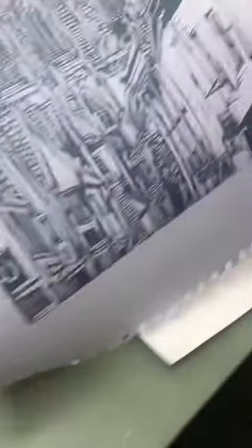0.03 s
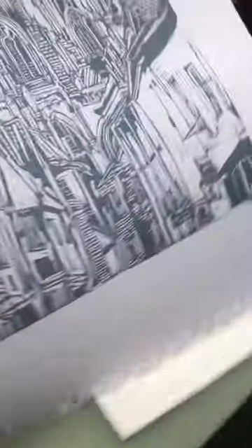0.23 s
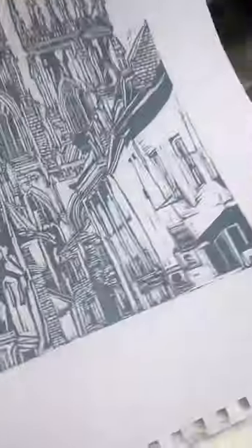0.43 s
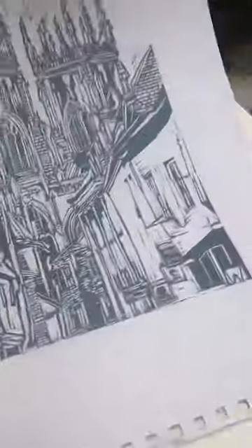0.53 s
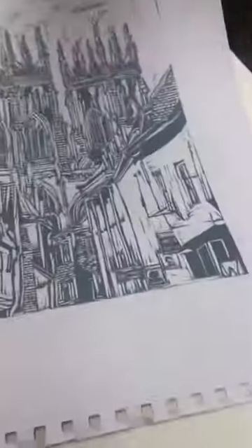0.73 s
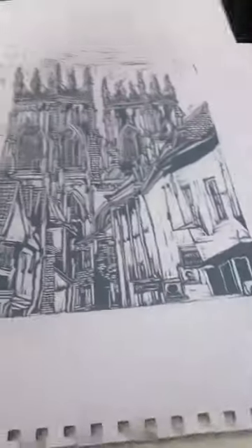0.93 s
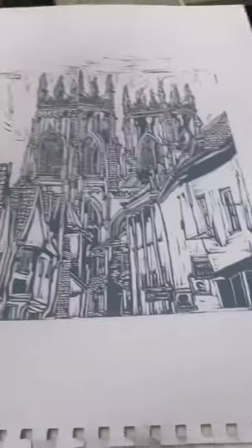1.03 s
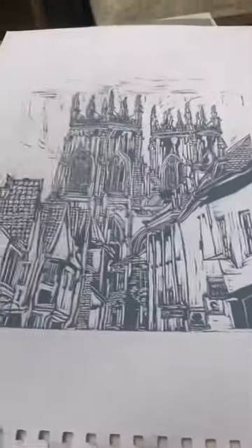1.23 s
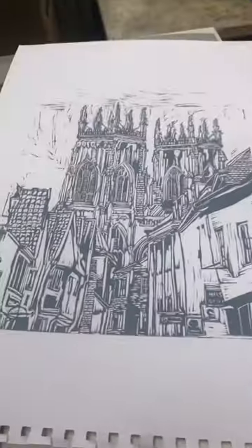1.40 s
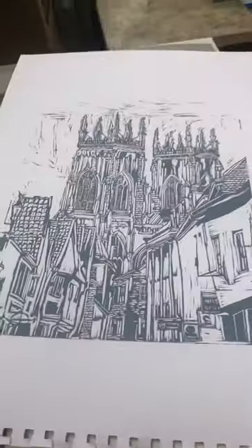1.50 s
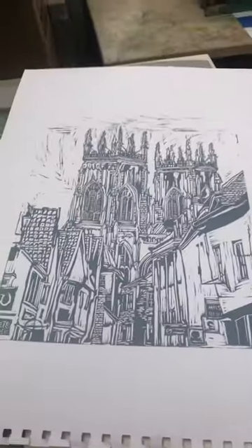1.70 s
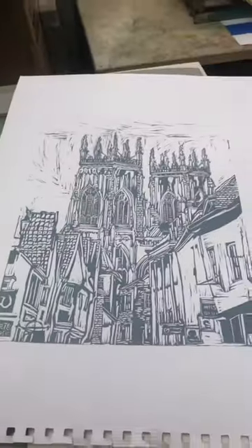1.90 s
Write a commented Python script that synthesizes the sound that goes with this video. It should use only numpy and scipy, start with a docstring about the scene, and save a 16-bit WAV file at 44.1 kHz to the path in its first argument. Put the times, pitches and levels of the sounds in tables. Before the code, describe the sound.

A sheet of paper slides off a sketch pad close by with a fine hiss, buckling in a cluster of sharp snaps around 0.3 seconds. Hollow wobbling pops, edge scrapes and more crackles continue until about 0.8 seconds. It settles with small ticks near 0.9 seconds. A few very soft brushes follow from 1.2 to 1.8 seconds, over a faint low hum in a quiet room.

```python
"""Drawing paper lifted and laid flat.

A sheet comes off a sketch pad, close by in a quiet room. Its fibres catch on the page below with a
fine hiss and its edge scrapes. It buckles with sharp snaps, wobbles with hollow pops and settles.
A few soft brushes follow, over a low hum."""
import sys
import numpy as np
from scipy import signal
from scipy.fft import rfft, irfft
from scipy.io import wavfile
from scipy.ndimage import uniform_filter1d

SR = 44100
rng = np.random.default_rng(int(sys.argv[2]) if len(sys.argv) > 2 else 0)


def transcribe(signal):
    """Save signal, clipped to [-1, 1], as a 16-bit WAV file at the path in sys.argv[1]."""
    frames = np.atleast_2d(signal).T
    limited = np.clip(frames, -1, 1)
    pcm = np.round(limited * 32767).astype(np.int16)
    wavfile.write(sys.argv[1], SR, pcm)


N = 85995

# Each row: frequency in Hz, relative level in dB.
RUB_SPECTRUM = [(60, -41), (200, -5.5), (700, -1), (1500, 0), (3000, 0), (4300, -3), (5400, -3), (7000, -5),
                (10000, -7), (16000, -9)]
# Each row: centre in Hz, width in Hz, boost in dB.
SHEET_RESONANCES = [(4890, 380, 4.2)]
PATCH_DB, JUDDER_DB, TILT_FROM_HZ = 2.5, 1.07, 600


def rub(contour):
    """Catching fibres excite the sheet as the contact shifts; contour(t) gives dB and dB per octave."""
    fibres = clicks(per_s=26000, spread_db=1.84)
    hz, t, spectra = signal.stft(fibres, SR, nperseg=512, noverlap=384)
    level_db, _ = contour(np.arange(N) / SR)
    _, tilt = contour(t)
    resonance_db = sum(db / (1 + (2 * (hz - f) / width) ** 2) for f, width, db in SHEET_RESONANCES)
    octaves = np.log2(np.maximum(hz / TILT_FROM_HZ, 1))
    gain = amp(at_hz(RUB_SPECTRUM, hz) + resonance_db + tilt[:, None] * octaves)
    gain /= np.sqrt(np.mean(gain ** 2, axis=1, keepdims=True))
    patches = uniform_filter1d(rng.standard_normal(gain.shape), size=12, axis=0)
    patches = unit(uniform_filter1d(patches, size=4, axis=1))
    gain *= amp(PATCH_DB * patches)
    hiss = signal.istft(spectra * gain.T, SR, nperseg=512, noverlap=384)[1][:N]
    judder = unit(uniform_filter1d(rng.standard_normal(N), size=200))
    return unit(hiss) * amp(level_db + JUDDER_DB * judder)


# Each row: time in seconds, level in dB, treble tilt in dB per octave.
SLIDE_CONTOUR = [(0, -61.5, -1.5), (.12, -57.5, -1), (.2, -52, -2), (.252, -47, .5), (.275, -41.5, -7.5),
                 (.287, -50, -3), (.315, -59.5, 0), (.35, -50, -1.5), (.4, -50.5, -2), (.47, -54.5, 1.2),
                 (.48, -51.5, 2), (.518, -43, -1), (.532, -51, 0.5), (.575, -49, 2), (.605, -44.5, 0.5),
                 (.648, -40, 0.5), (.672, -44, -0.5), (.685, -49, -1), (.728, -52.5, 0.5),
                 (.756, -44.5, .5), (.764, -55, -3), (.81, -63, 1), (.93, -64, -0.9), (1.02, -75, 1.5)]


def slide():
    """The sheet rubs over the page below."""
    return rub(lambda t: at_times(SLIDE_CONTOUR, t))


# Each row: start in seconds, pitch in Hz, level in dB, relative flutter level in dB,
# flutter decay in seconds, relative crack level in dB.
SNAPS = [(0.256, 2870, -14.5, -7, 0.00097, -26), (0.2572, 1100, -19.5, -3.5, 0.0065, -12),
         (0.2602, 3900, -26.5, -4, 0.0027, -5), (0.2622, 7400, -25, 4, 0.0035, -8),
         (0.2785, 2970, -43.5, 6.5, 0.0022, -0.5), (0.2917, 2970, -29, 7, 0.0018, -10),
         (0.296, 3220, -19.5, 1, 0.00087, -16), (0.296, 15200, -21, -4.5, 0.001, -12.5),
         (0.2965, 1260, -25.5, -1, 0.0025, -17), (0.3282, 1660, -36, 2, 0.0018, -13),
         (0.348, 2830, -31, 1, 0.0011, -8), (0.3706, 750, -25.5, 3.5, 0.007, -40),
         (.387, 150, -36, 0, 0.0054, -41), (0.4744, 7350, -29.5, -8, 0.0012, -6),
         (0.5880, 870, -29, 5, 0.0056, -10), (0.6203, 900, -21, -14, 0.0028, -14),
         (0.6227, 1610, -26.5, 6, 0.0048, -23), (0.695, 255, -42.5, -2, 0.004, -25),
         (0.898, 264, -44, -15, 0.0033, -23), (0.9268, 374, -42, -3.5, 0.0052, -23),
         (0.9266, 1760, -41, 1, 0.0045, -16), (0.9324, 4650, -43.5, -1, 0.00056, -13),
         (.961, 2870, -38, -9, 0.0028, -7), (1.5937, 704.5, -52, -2.5, 0.0027, 0.5)]
SWELL_CYCLES, RING_CYCLES, SAG_CYCLES, SAG_SHARE = 0.75, 0.46, 4, 0.24
CRACK_CUTOFF_HZ, CRACK_DECAY_S = 6660, 0.00084


def buckle(hz, db, flutter_db, flutter_s, crack_db):
    """A flick and a crack, then a flutter of reflections from the edges of the sheet."""
    t = np.arange(SR // 10) / SR
    scatter, grit = rng.standard_normal((2, len(t)))
    grit = unit(signal.lfilter(*signal.butter(2, CRACK_CUTOFF_HZ, fs=SR), grit))
    direct = flick(t, hz) + amp(crack_db) * grit * np.exp(-t / CRACK_DECAY_S)
    echoes = scatter ** 3 * np.sqrt(t) * np.exp(-t / flutter_s)
    flutter = signal.fftconvolve(direct, echoes)[:len(t)]
    return amp(db) * (direct + amp(flutter_db) * direct.std() * unit(flutter))


def flick(t, hz):
    """Peaks within a cycle and sags in pitch: the slower, lower bending waves arrive last."""
    cycles = t * hz
    sag = SAG_SHARE * (1 - np.exp(-cycles / SAG_CYCLES))
    phase = 2 * np.pi * np.cumsum(hz * (1 - sag)) / SR
    envelope = (1 - np.exp(-(cycles / SWELL_CYCLES) ** 2)) * np.exp(-cycles / RING_CYCLES)
    return envelope / envelope.max() * np.sin(phase)


# Each row: time in seconds, level in dB.
WOBBLE_LEVEL = [(0, -61.5), (.245, -76), (.265, -52.5), (.31, -48.5), (.335, -53.5), (.362, -45.5),
                (.378, -39), (.43, -40), (.475, -43.5), (.53, -61), (.575, -64), (.595, -45), (.64, -49.5),
                (.67, -65), (.74, -66), (.768, -47), (.82, -70.5), (.93, -63.5), (1, -74)]
# Each row: frequency in Hz, relative level in dB.
WOBBLE_SPECTRUM = [(50, -69), (110, -11), (150, 1), (320, 1.5), (620, 0.5), (980, -4), (1250, -13.5),
                   (2500, -43), (16000, -57)]


def wobble():
    """The bowed sheet flexes in a run of small hollow pops."""
    pops = coloured(clicks(per_s=1500, spread_db=1), WOBBLE_SPECTRUM)
    return pops * amp(at_times(WOBBLE_LEVEL, np.arange(N) / SR)[0])


# Each row: start in seconds, length in seconds, pitch in Hz, bandwidth in Hz, level in dB.
EDGE_SCRAPES = [(0.15, 0.13, 2950, 440, -60.5), (0.45, 0.07, 6500, 5000, -50.5),
                (0.476, 0.059, 2030, 580, -53.5), (0.56, 0.096, 2480, 93, -51.5),
                (0.58, .15, 5260, 300, -57)]
SCRAPE_ATTACK_S, SCRAPE_RELEASE_S = 0.001, 0.011
WANDER_SHARE, WANDER_RATE_HZ = 0.0089, 25.2


def scrape(length_s, hz, width_hz, db):
    """Stick and slip keeps one resonance of the edge ringing; its pitch drifts with the grip."""
    t = np.arange(0, length_s, 1 / SR)
    f = np.fft.rfftfreq(N, 1 / SR)
    slips, grip = rfft(rng.standard_normal((2, N)))
    resonance = 1 / (1 + (2 * (f - hz) / width_hz) ** 2)
    ring = signal.hilbert(irfft(slips * resonance, N))[:len(t)]
    wander = unit(irfft(grip * np.exp(-(f / WANDER_RATE_HZ) ** 2), N))[:len(t)]
    shift_hz = hz * WANDER_SHARE * wander
    bent = (ring * np.exp(2j * np.pi * np.cumsum(shift_hz) / SR)).real
    envelope = np.minimum(t / SCRAPE_ATTACK_S, 1) * np.minimum((length_s - t) / SCRAPE_RELEASE_S, 1)
    return amp(db) * unit(bent) * envelope


# Each row: peak time, rise and fall in seconds, level in dB, treble tilt in dB per octave.
BRUSH_STROKES = [(1.214, 0.086, 0.11, -61, -3.5), (1.391, 0.049, 0.033, -62.5, -3.5),
                 (1.625, 0.013, 0.046, -61.5, -1.5), (1.662, 0.028, 0.016, -62.5, 4.5),
                 (1.765, 0.008, 0.0073, -66, -2.5)]


def brushes():
    """Soft rubs over the flat sheet, each swelling and fading as a bell curve."""
    def contour(t):
        power = np.array([amp(db) ** 2 * np.exp(-((t - peak) / np.where(t < peak, rise, fall)) ** 2)
                          for peak, rise, fall, db, _ in BRUSH_STROKES]) + 1e-16
        tilts = np.array(BRUSH_STROKES)[:, 4]
        return 10 * np.log10(power.sum(0)), tilts @ power / power.sum(0)
    return rub(contour)


# Each row: frequency in Hz, time to fall 60 dB in seconds.
ROOM_DECAY = [(150, 0.51), (800, 0.13), (3000, 0.29), (12000, 0.04)]
REVERB_DB, REVERB_DELAY_S = -18.5, 0.0055


def reverb(x):
    """The short tail of a small furnished room."""
    hz, t, spectra = signal.stft(rng.standard_normal(SR // 2), SR, nperseg=256)
    decay = amp(-60 * t / at_hz(ROOM_DECAY, hz)[:, None])
    tail = signal.istft(spectra * decay, SR, nperseg=256)[1]
    wet = np.zeros(N)
    add(wet, REVERB_DELAY_S, signal.fftconvolve(x, tail / np.linalg.norm(tail)))
    return amp(REVERB_DB) * wet


# Each row: time in seconds, pitch in Hz.
HUM_PITCH = [(0, 55.33), (.3, 58.1), (1.25, 61.06), (1.95, 62.03)]
# Each row: time in seconds, level in dB.
HUM_LEVEL = [(0, -49), (.2, -53.5), (.47, -53), (.8, -67.5), (1.15, -65.5), (1.23, -55.5), (1.52, -60),
             (1.66, -55), (1.95, -59.5)]
# Each row: harmonic number, level in dB relative to the fundamental.
HUM_HARMONICS = [(2, -18), (3, -18)]


def hum():
    """A low hum that creeps up in pitch while its level dips and swells."""
    t = np.arange(N) / SR
    phase = 2 * np.pi * np.cumsum(at_times(HUM_PITCH, t)[0]) / SR
    overtones = sum(amp(db) * np.sin(k * phase + 2 * np.pi * rng.random()) for k, db in HUM_HARMONICS)
    return amp(at_times(HUM_LEVEL, t)[0]) * unit(np.sin(phase) + overtones)


# Each row: frequency in Hz, relative level in dB.
ROOM_TONE_SPECTRUM = [(20, -21), (45, 5.5), (90, 5.5), (170, 3.5), (300, 0.5), (600, -17), (1500, -18),
                      (4000, -22), (9000, -22.5), (16000, -37)]
ROOM_TONE_DB = -65.5


def room_tone():
    """Faint steady noise, mostly bass."""
    return amp(ROOM_TONE_DB) * coloured(rng.standard_normal(N), ROOM_TONE_SPECTRUM)


def clicks(per_s, spread_db):
    """Random clicks of random sign, a few of them large, at rms 1."""
    size = amp(spread_db * np.minimum(rng.exponential(1, N), 4))
    return unit(size * rng.choice([-1., 1.], N) * (rng.random(N) < per_s / SR))


def coloured(x, spectrum):
    """Filters x by a spectrum, at rms 1."""
    gain = amp(at_hz(spectrum, np.fft.rfftfreq(len(x), 1 / SR)))
    return unit(irfft(rfft(x) * gain, len(x)))


def amp(db):
    """Decibels to gain."""
    return 10 ** (np.asarray(db) / 20)


def unit(x):
    """Scales to rms 1."""
    return x / np.sqrt(np.mean(x ** 2) + 1e-20)


def at_hz(table, hz):
    """Interpolates a table on a log-frequency axis."""
    f, values = np.transpose(table)
    return np.interp(np.log(hz + 1), np.log(f), values)


def at_times(table, t):
    """Interpolates each value column at the times t."""
    times, *columns = np.transpose(table)
    return [np.interp(t, times, column) for column in columns]


def add(mix, start_s, sound):
    """Mixes a sound in at start_s."""
    part = mix[round(start_s * SR):][:len(sound)]
    part += sound[:len(part)]


def scene():
    """The paper, its reverb and the background, in mono."""
    paper = slide() + brushes() + wobble()
    background = hum() + room_tone()
    for start_s, *row in SNAPS:
        add(paper, start_s, buckle(*row))
    for start_s, *row in EDGE_SCRAPES:
        add(paper, start_s, scrape(*row))
    return (paper + reverb(paper) + background)[None]


def record(dry):
    """Bass cut at 40 Hz, band limit at 15750 Hz."""
    highpass = signal.butter(4, 40, "highpass", fs=SR, output="sos")
    lowpass = signal.firwin(511, 15750, window=("kaiser", 9), fs=SR)
    return signal.oaconvolve(signal.sosfilt(highpass, dry), lowpass[None], "same")


dry = scene()
out = record(dry)
transcribe(out)
```